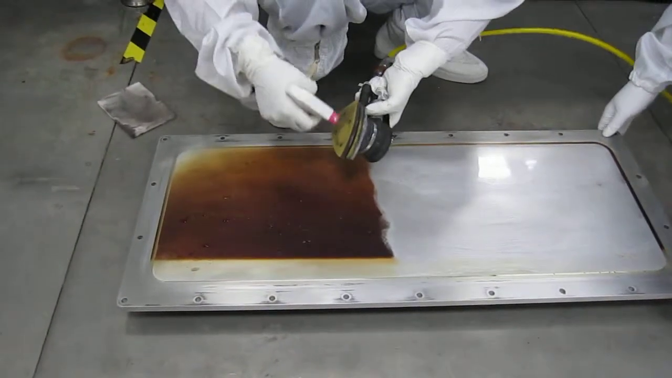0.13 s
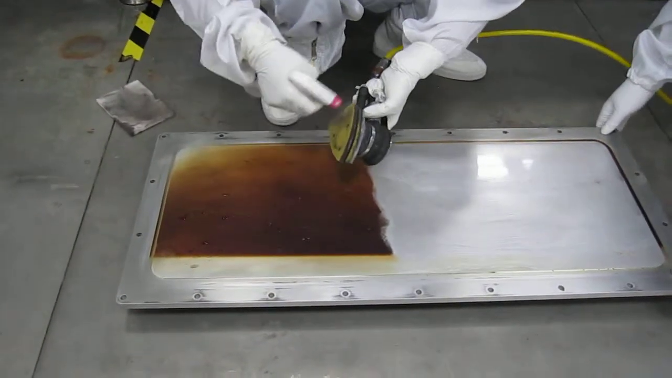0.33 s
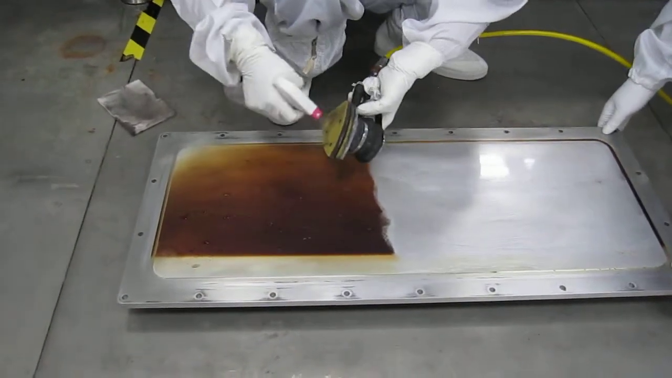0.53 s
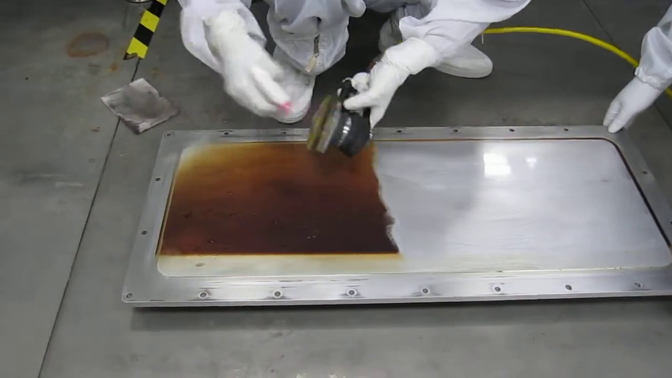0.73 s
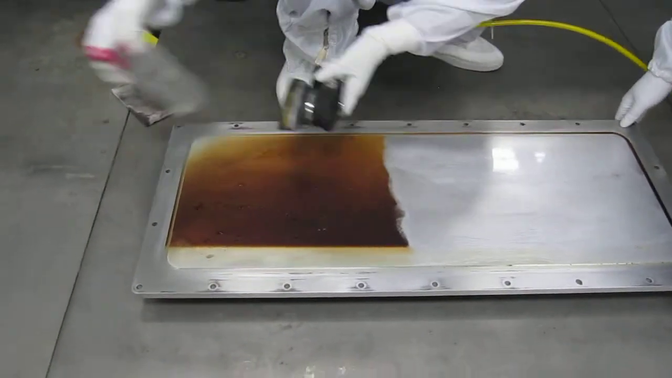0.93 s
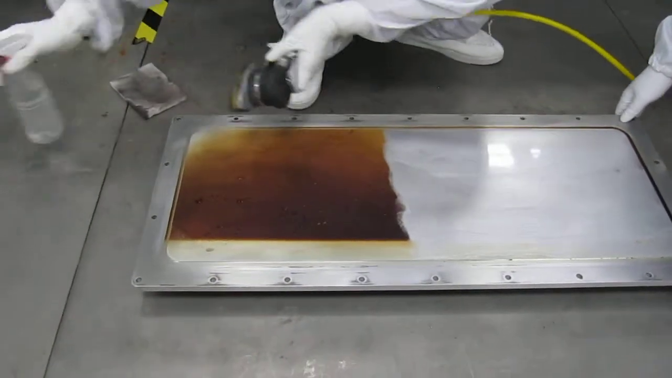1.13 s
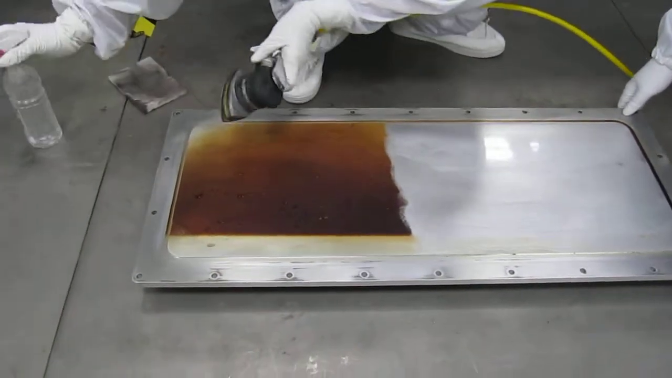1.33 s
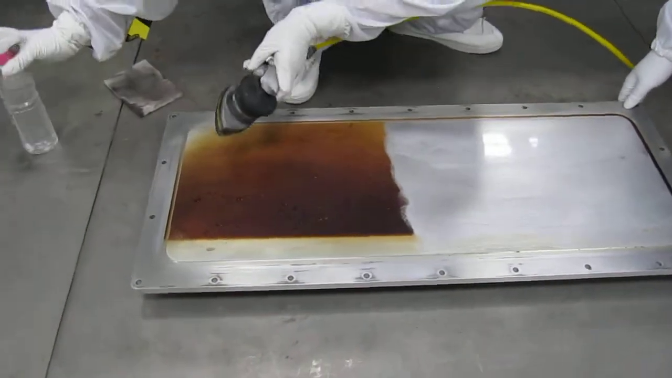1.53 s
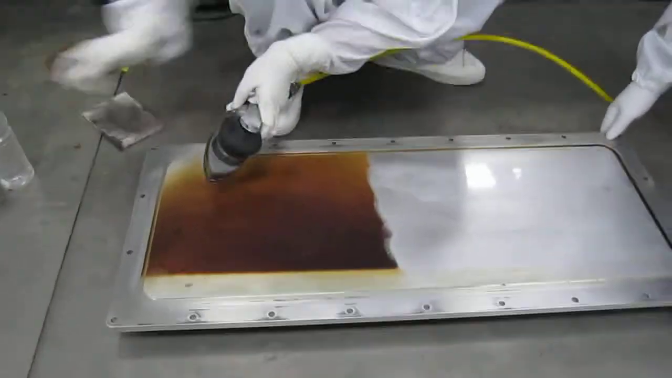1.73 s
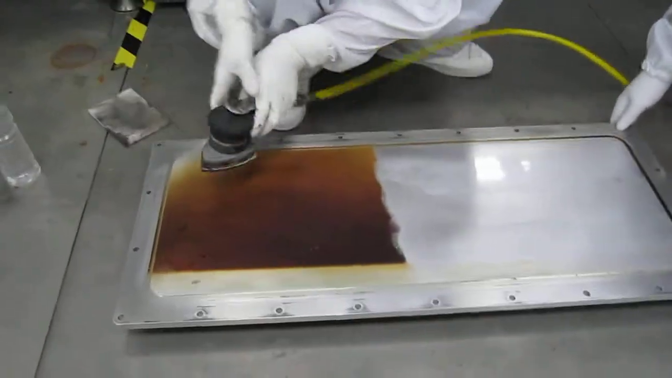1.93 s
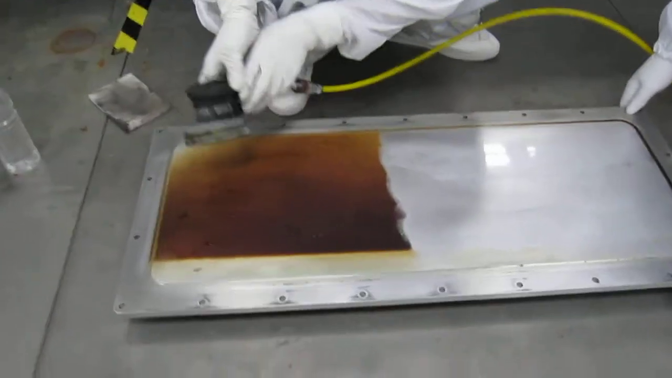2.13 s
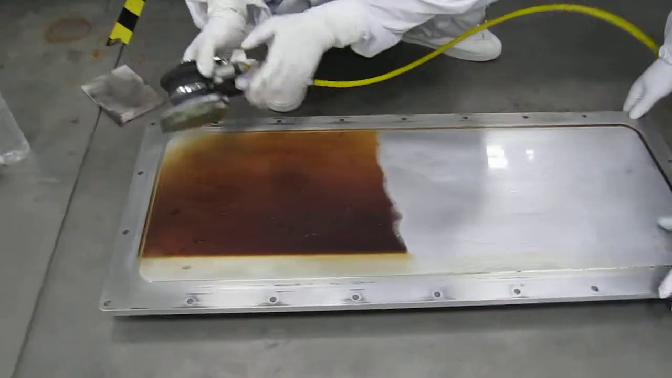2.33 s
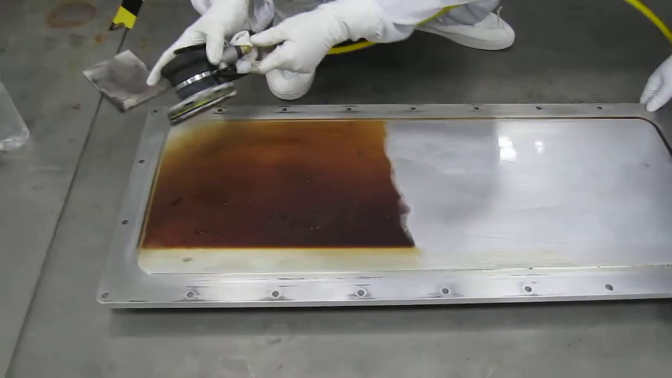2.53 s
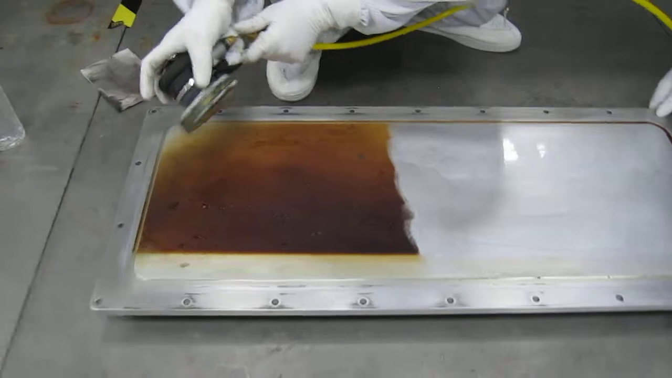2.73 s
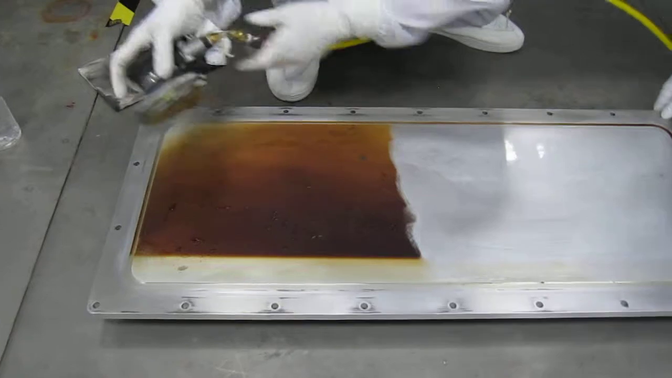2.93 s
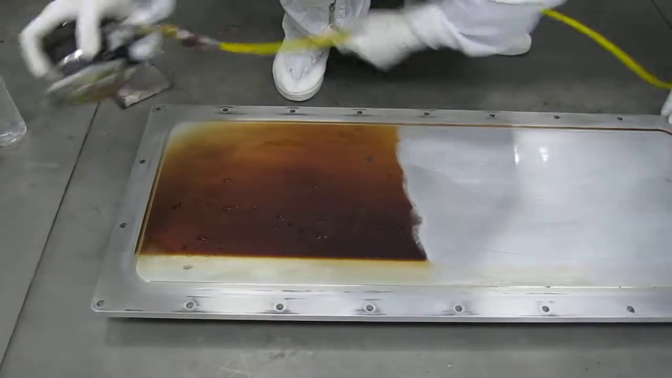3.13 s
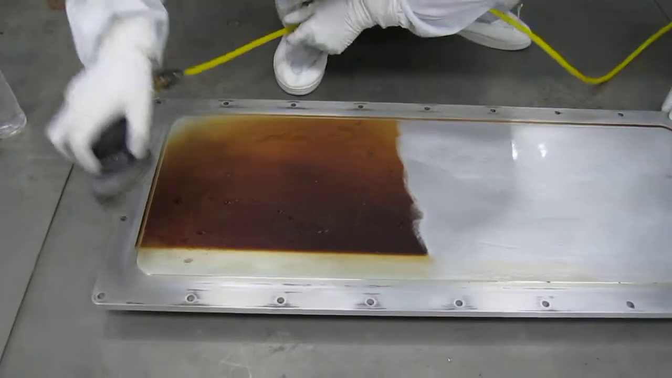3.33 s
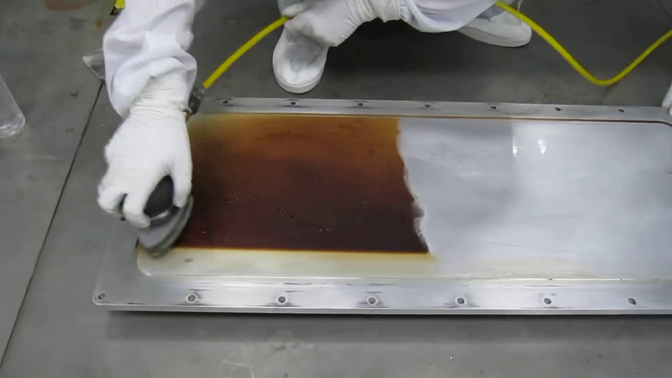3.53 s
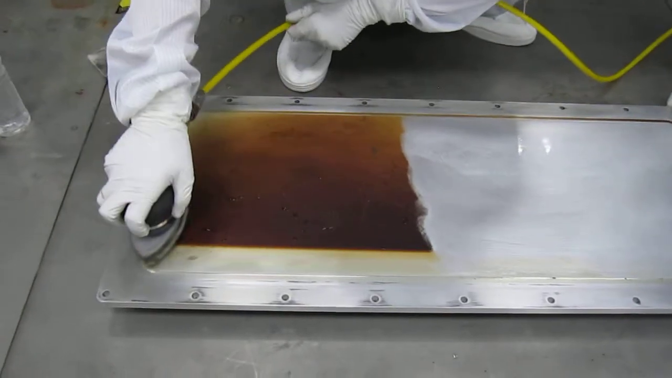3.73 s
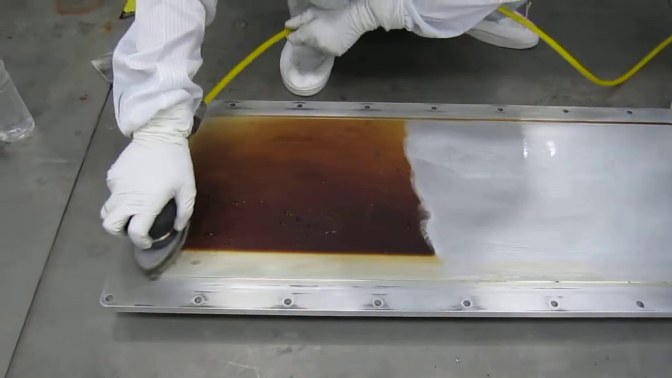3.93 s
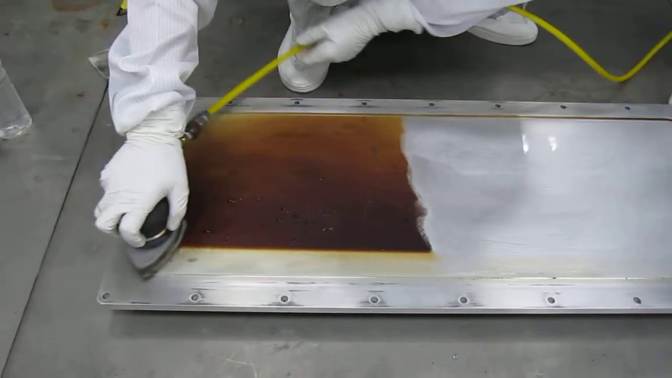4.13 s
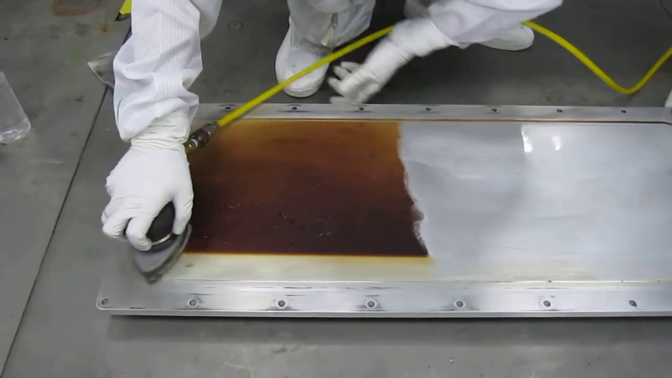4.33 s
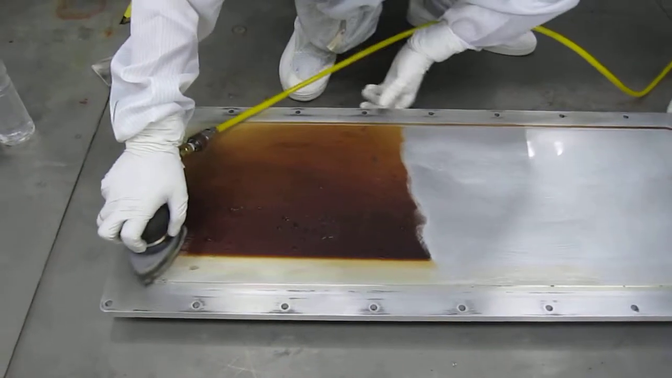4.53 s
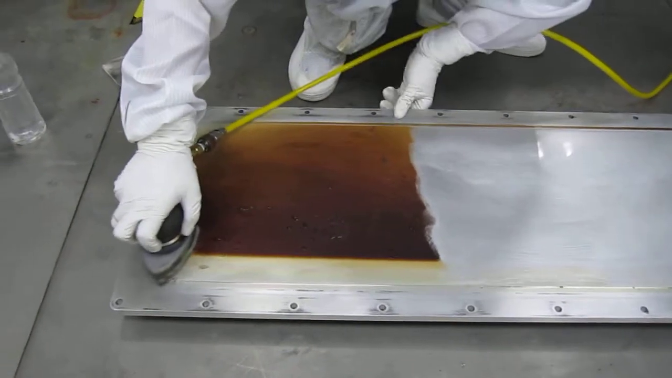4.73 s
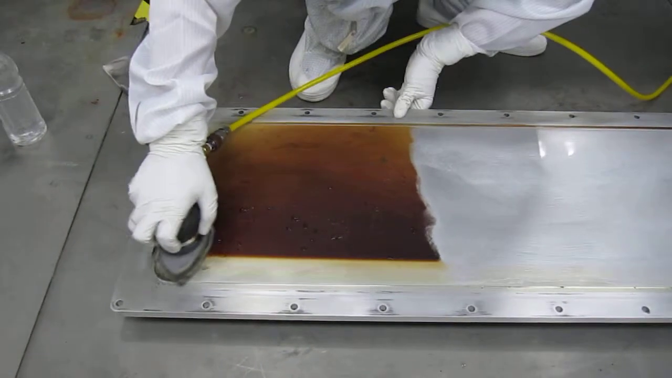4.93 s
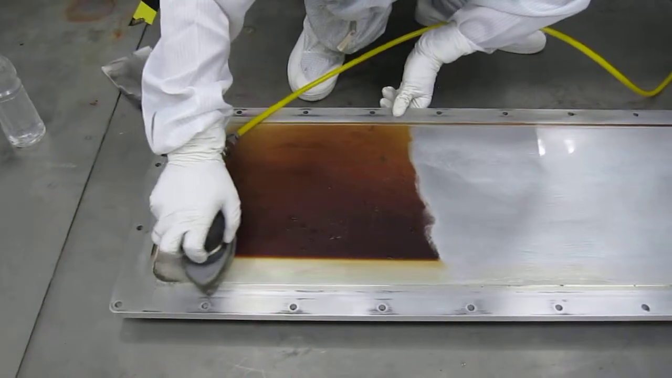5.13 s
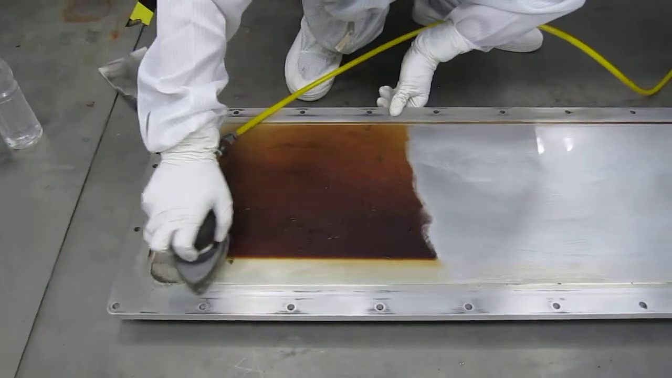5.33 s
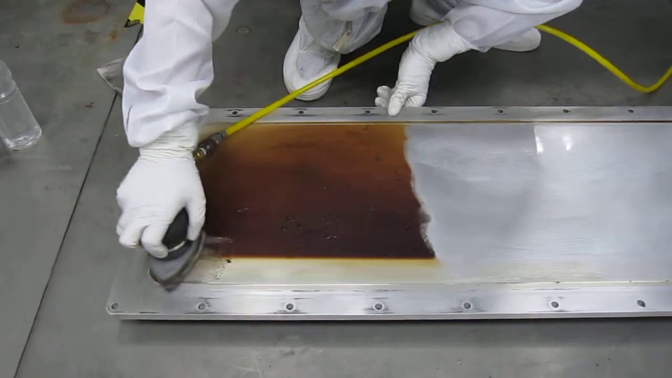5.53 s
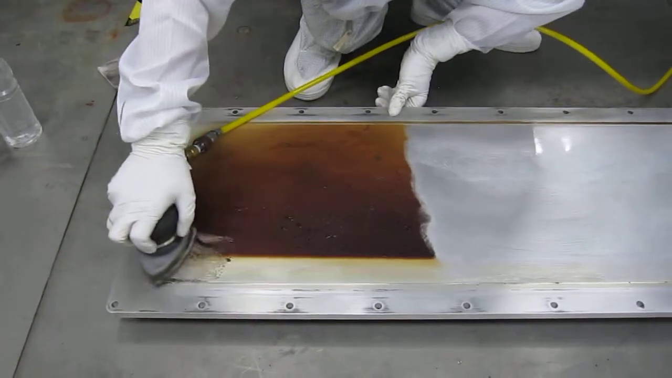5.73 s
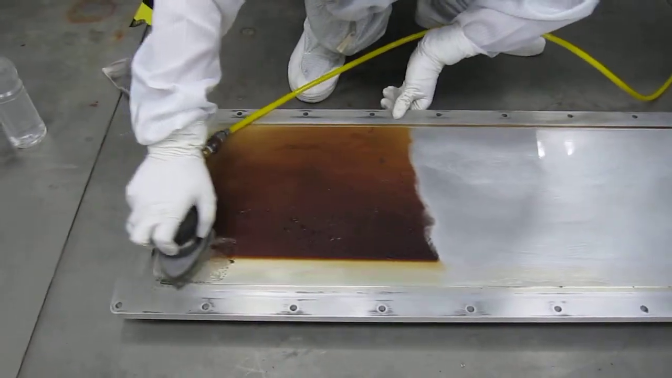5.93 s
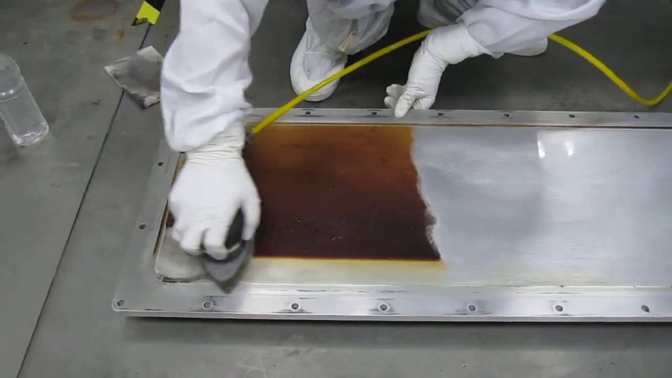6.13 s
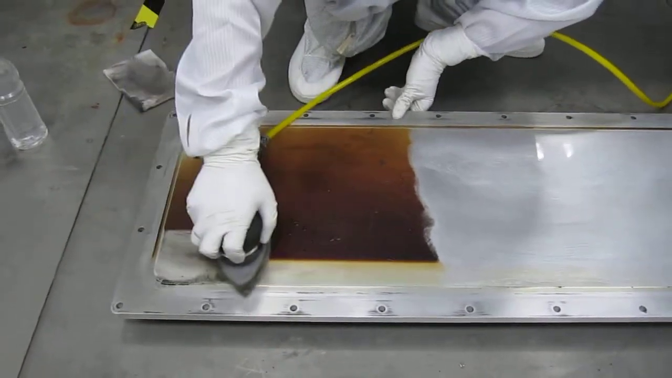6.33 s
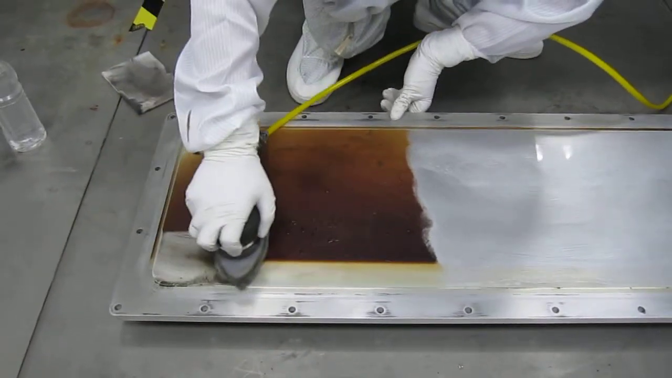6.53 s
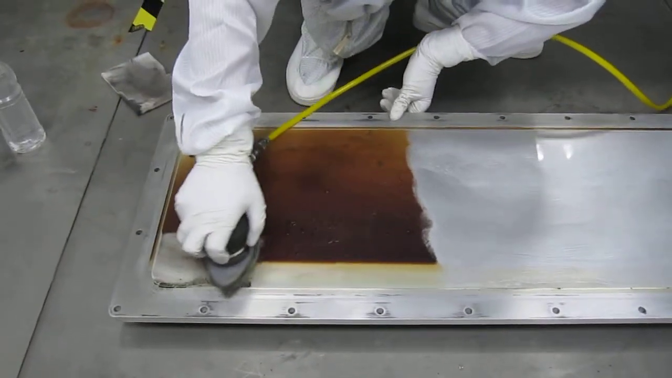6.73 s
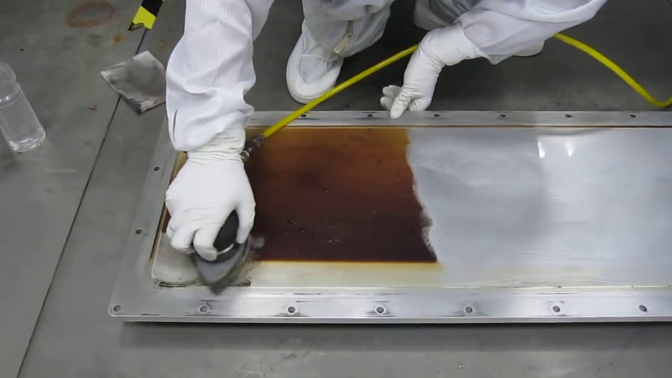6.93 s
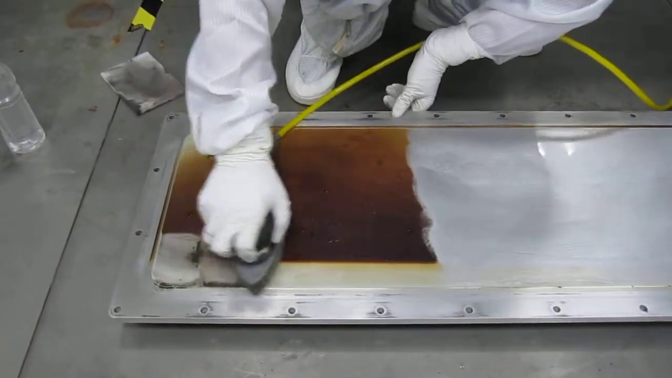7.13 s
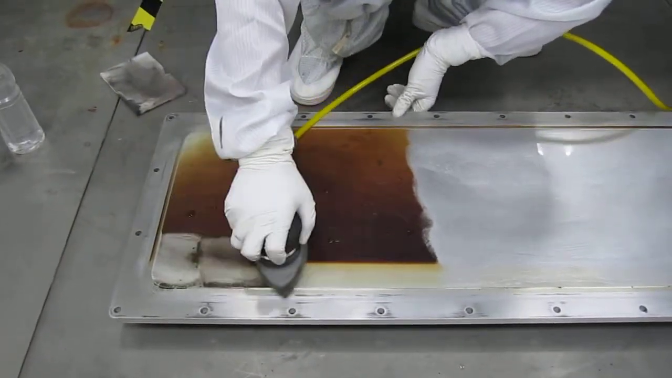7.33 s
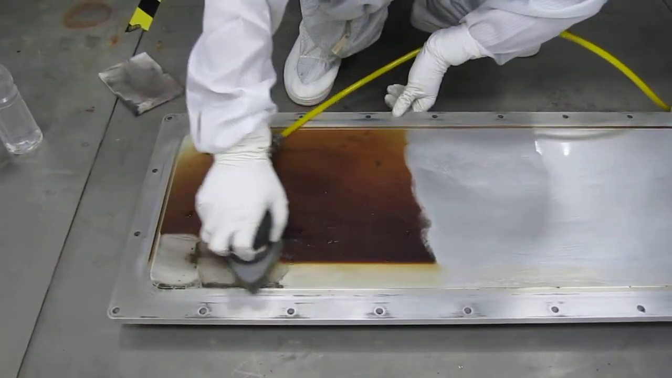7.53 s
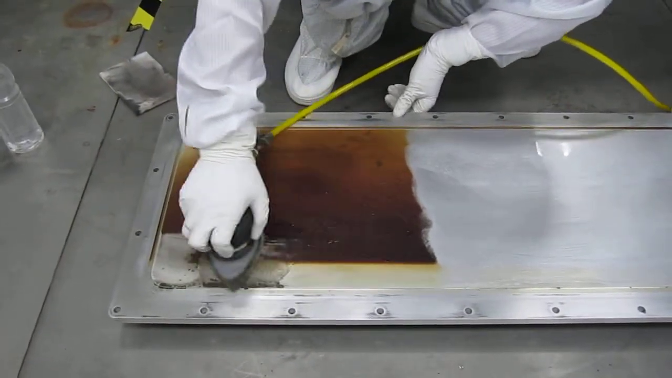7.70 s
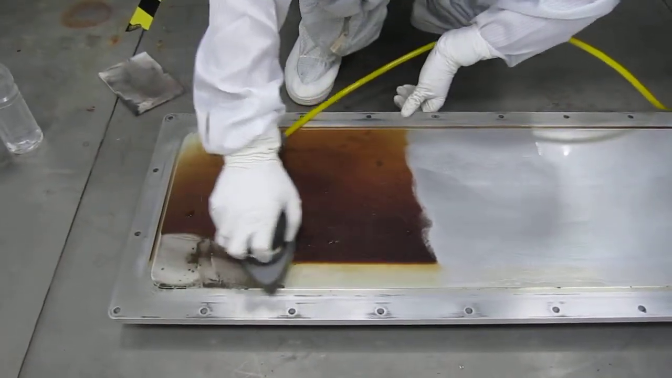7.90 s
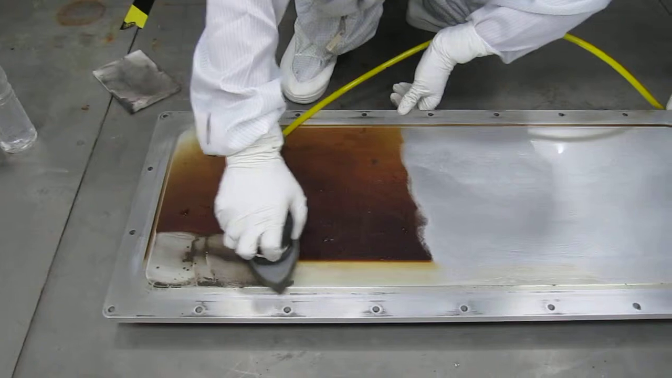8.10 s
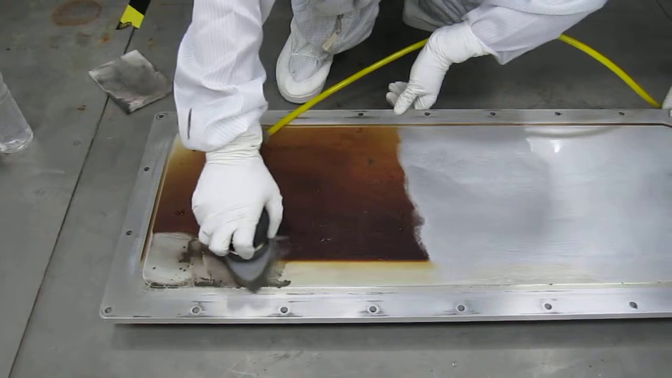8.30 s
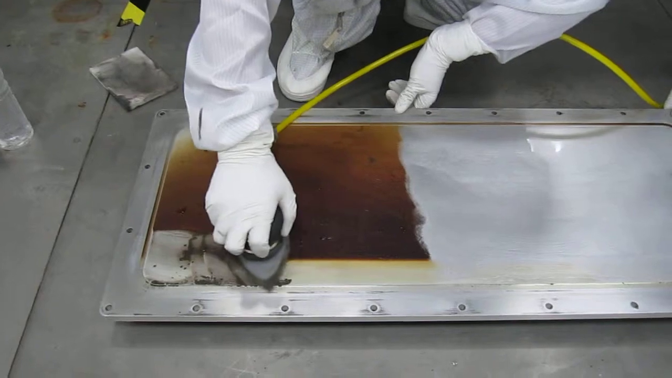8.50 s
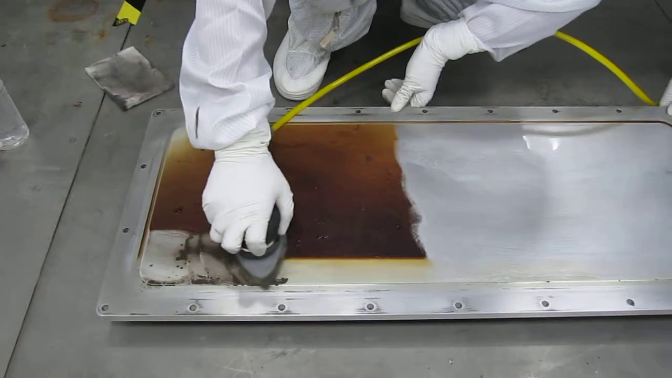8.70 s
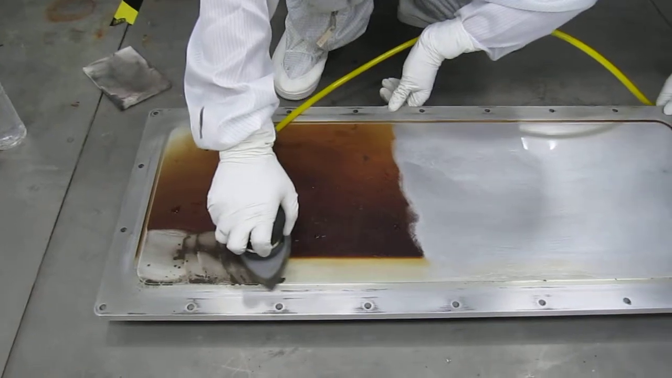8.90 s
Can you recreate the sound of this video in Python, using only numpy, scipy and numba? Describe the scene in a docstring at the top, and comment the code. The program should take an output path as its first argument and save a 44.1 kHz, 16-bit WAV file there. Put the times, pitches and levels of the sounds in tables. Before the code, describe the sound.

Quiet ventilation rumble with faint machine tones. Three soft spray puffs, suit swishes, a bright click and a light bottle landing come first; then handling clicks quicken, a valve whistles and spits air, and a hand polisher bursts into life. Its nasal motor whine wavers slightly under hand pressure, over a ringing housing, airy exhaust and grainy rubbing on metal, continuing to the end. Close mono sound in a reflective room.

```python
"""A hard, humming workshop: an air-driven hand polisher starts up and works on a metal panel.
First a spray bottle squirts mist and is put down, while a suit rustles and small parts click.
Then the valve lets air whistle in, and a five-vane motor spins up, built from sines tied to its shaft.
Shaped noise makes the ringing housing, the exhaust hiss and the pad's scrubbing.
Decaying sines make the knocks, a noise tail makes the room, and loud sound is turned down."""
import sys
import numpy as np
from scipy import signal
from scipy.fft import rfft, irfft
from scipy.io import wavfile
from scipy.ndimage import uniform_filter1d
from numba import njit

SR = 44100
rng = np.random.default_rng(int(sys.argv[2]) if len(sys.argv) > 2 else 0)


def dump_mix(stems):
    """Bounce the given channels to the path in sys.argv[1] as a 16-bit WAV at rate SR."""
    frames = np.atleast_2d(stems).T  # one column per channel
    limited = np.clip(frames, -1, 1)  # hard clip at full scale
    pcm = np.round(limited * 32767).astype(np.int16)
    wavfile.write(sys.argv[1], SR, pcm)


def boost(x):
    """Linear amplitude factor 10**(x/20) for a level x in decibels (scalar or array-like)."""
    u = np.asarray(x, float) / 20
    return 10 ** u


N = 395136
TIME = np.arange(N) / SR
START_S = 3.25  # the motor becomes audible


def gate_between(start_s, end_s):
    """A switch that opens and closes over 10 ms, so that nothing clicks."""
    return uniform_filter1d(1. * ((TIME >= start_s) & (TIME <= end_s)), size=441)


def curves(table):
    """Join each column by straight lines over time."""
    s, *columns = np.transpose(table)
    return [np.interp(TIME, s, column) for column in columns]


def unit(x):
    """Scale to rms 1."""
    return x / np.sqrt(np.mean(x ** 2))


def noise():
    """White noise: all pitches equally strong."""
    return rng.standard_normal(N)


def colour(x, points):
    """Shape the spectrum by (f/Hz, level/dB) points joined on a log pitch axis; rms 1."""
    hz, db = np.transpose(points)
    f = np.arange(N // 2 + 1) * SR / N + 1
    gain = boost(np.interp(np.log(f), np.log(hz), db))
    return unit(irfft(rfft(x) * gain, N))


@njit
def svf(x, hz, width):
    """State-variable band-pass whose centre may move; gain 1 at the centre."""
    y, b, l = np.empty(len(x)), 0., 0.
    for i in range(len(x)):
        g, k = np.tan(np.pi * hz[i] / SR), width / hz[i]
        v = (b + g * (x[i] - l)) / (1 + g * (g + k))
        b, l, y[i] = 2 * v - b, l + 2 * g * v, k * v
    return y


def band(x, hz, width):
    """Band-pass that stays at one pitch."""
    return svf(x, np.full(N, float(hz)), float(width))


def smooth(x, k):
    """Average over k neighbours, twice."""
    return uniform_filter1d(uniform_filter1d(x, k), k)


def walk(rate):
    """Random wavering: a new level every 1 / rate s, smoothed; rms 1."""
    k = int(SR / rate)
    return unit(smooth(np.repeat(rng.standard_normal(N // k + 1), k), k)[:N])


def patchy(points, patchy_db, width_hz, count):
    """Coloured noise with random peaks and dips that melt into new ones as the reflections shift."""
    spectrum, out = rfft(colour(noise(), points)), 0
    k = max(int(width_hz * N / SR), 1)
    for i, draw in enumerate(rng.standard_normal((count, N // 2 + 1))):
        ripple = 2 * np.tanh(unit(smooth(draw, k)) / 2)
        fade = np.clip(1 - np.abs(TIME / TIME[-1] * (count - 1) - i), 0, 1)
        out = out + fade * irfft(spectrum * boost(patchy_db * ripple), N)
    return unit(out)


def swell(s, width):
    """A bell-shaped rise and fall."""
    return np.exp(-.5 * ((TIME - s) / width) ** 2)


def rise(full_db, lack_db, rise_s, drift_db):
    """Level in dB that makes up its lack after the start, plus a steady drift in dB per s."""
    t = np.maximum(TIME - START_S, 0)
    return full_db + lack_db * np.exp(-t / rise_s) + drift_db * t


def ring(hz, t60, length=.15):
    """One sine that sets in within a fraction of a cycle and fades by 60 dB in t60 seconds."""
    t = TIME[:int(length * SR)]
    onset = 1 - np.exp(-10 * hz * t)
    return np.sin(2 * np.pi * hz * t) * np.exp(-np.log(1000) * t / t60) * onset


def add(out, s, sound):
    """Mix a sound in at time s."""
    i = int(s * SR)
    out[i:i + len(sound)] += sound


def butter(x, order, hz, kind):
    """Plain filter that lets through highs ("high") or a range of pitches ("band")."""
    return signal.sosfilt(signal.butter(order, hz, kind, fs=SR, output="sos"), x)


# colour of the ventilation noise: f/Hz, relative level/dB
VENTILATION = [(20, -24), (60, -1), (117, 1.5), (200, -1.5), (350, -3), (700, -4), (2600, -8),
               (11000, -17.5), (16000, -25)]
# distant machines: middle f/Hz, middle level/dB (sine peak against the ventilation's rms)
MACHINES = [(134.6, -12), (203, -21.5), (339.1, -10.5), (672.9, -16.5)]


def hall():
    """Ventilation rumble with a few machine tones that drift in level and slightly in pitch."""
    tones = 0
    for f, db in MACHINES:
        turn = 2 * np.pi * f * np.cumsum(1 + 0.00407 * walk(9)) / SR
        tones = tones + boost(db + 5.9 * walk(4.95)) * np.sin(turn)
    rumble = boost(0.29 * walk(5.67)) * colour(noise(), VENTILATION)
    return boost(-44.5) * (rumble + tones)


def room(x):
    """Hard walls add a decaying noise tail, duller than the direct sound."""
    t60_s, tail_db = 0.6, -12.5
    t = TIME[:SR // 2]
    tail = rng.standard_normal(len(t)) * np.exp(-np.log(1000) * t / t60_s) * (t > .004)
    tail = signal.lfilter([.4], [1, -.6], tail)
    tail = tail / np.sqrt(np.sum(tail ** 2))
    return x + boost(tail_db) * signal.fftconvolve(x, tail)[:N]


# swishes of suit, gloves and hose: peak t/s, width t/s, level/dB, brightness (dB per octave, roughly)
SWISHES = [(.2, 0.11, -41, -7), (.71, 0.03, -42.5, -5), (.947, 0.011, -38, -5), (1.15, 0.084, -43, -1.5),
           (1.71, 0.023, -45, -8.5), (2.14, 0.025, -43, -1.5), (2.6, 0.0089, -39.5, -1.5),
           (2.73, 0.012, -43, -9), (2.978, 0.016, -32.5, -2.5), (3.05, 0.04, -39.5, -2)]


def rustle():
    """Stiff fabric: noise with uneven tiny crackles, dull or bright with each move."""
    # one sample in twenty is raised, by 12 dB at most
    boost_db = np.minimum(4 * rng.exponential(size=N), 12) * (rng.random(N) < .05)
    crackle = noise() * boost(boost_db)
    out = 0
    for s, width, db, tilt in SWISHES:
        points = [(200, -20 - 3 * tilt), (1500, -6 - 2 * tilt), (4500, 0),
                  (12000, 3 * tilt - 4), (16000, 4 * tilt - 10)]
        out = out + boost(db) * swell(s, width) * colour(crackle, points)
    return boost(1.6 * walk(90)) * out


# squeezes of the spray bottle: peak t/s, width t/s, mist level/dB, nozzle f/Hz
SQUEEZES = [(.1, 0.047, -32.5, 5250), (.375, 0.042, -35.5, 6160), (.583, 0.033, -32, 6230)]
# colour of the mist: f/Hz, relative level/dB
MIST_COLOUR = [(1500, -6.5), (3500, -3), (5500, 0.5), (7900, -7), (10600, -3), (13900, -5), (16000, -12)]


def spray():
    """Each squeeze blows a mist with its own nozzle tone; the last one ends in a faint whistle."""
    mist, jet = colour(noise(), MIST_COLOUR), noise()
    low_tone = boost(-13.0) * unit(band(jet, 3000, 300))
    out = 0
    for s, width, db, hz in SQUEEZES:
        nozzle = boost(-7.5) * unit(band(jet, hz, 450))
        out = out + boost(db) * swell(s, width) * (mist + nozzle + low_tone)
    # a thin whistle as the nozzle empties
    empty_s, decay_s = .7, .15
    fade = (TIME > empty_s) * np.exp(-np.abs(TIME - empty_s) / decay_s)
    out = out + boost(-49) * fade * unit(band(jet, 6600, 200))
    return out * boost(0.91 * walk(146.5))


# trigger, coupling and lever, and bright puffs of air at the valve (3.217, 3.238, 3.245 s): t/s, ring level/dB
# (before filtering), ring f/Hz, cycles to fade by 60 dB, crack level/dB
CLICKS_AND_CLACKS = [(.18, -22, 840, 12, -33), (.207, -40, 6000, 5, -35), (.612, -22.5, 923, 12, -45),
                     (0.9314, -9, 1280, 4, -21.5), (2.327, -25, 3800, 9, -39), (2.65, -34, 2200, 8, -39),
                     (2.817, -17.5, 1930, 11, -37), (2.964, -25, 2910, 94, -37),
                     (2.986, -23, 2720, 36, -39), (2.99, -27, 1130, 27, -45), (3.147, -7.5, 1330, 14, -26),
                     (3.16, -9.5, 1490, 14, -29), (3.214, -19, 190, 8, -45), (3.237, -15, 159, 6.5, -43),
                     (3.217, -15, 1630, 11, -11.5), (3.224, -7, 1510, 12, -19), (3.238, -24, 4200, 8, -4),
                     (3.245, -11, 4150, 12, -9)]


def clicks():
    """A small part struck, or a puff of air at the valve: a few cycles of ringing and a short crack of noise."""
    out = np.zeros(N)
    for s, ring_db, hz, cycles, crack_db in CLICKS_AND_CLACKS:
        add(out, s, boost(ring_db) * butter(ring(hz, cycles / hz), 2, hz / 2, "high"))
        # small parts ring high and crack brightly
        crack = butter(rng.standard_normal(800), 3, [hz / 2, min(3.3 * hz, 15000)], "band")
        add(out, s, boost(crack_db) * unit(crack) * np.exp(-TIME[:800] / 0.0038))
    return out


# the bottle lands and rocks: t/s, peak level/dB, hardness (dB per octave)
LANDINGS = [(1.327, -20, 6), (1.334, -24, -5), (1.343, -29, 5), (1.369, -25.5, 5), (1.377, -28, -3),
            (1.403, -32, -10)]
# ringing tones of the bottle: middle f/Hz, t/s to fade by 60 dB
BOTTLE_TONES = [(590, 0.06), (1100, 0.047), (1500, 0.035), (1750, 0.045), (2100, 0.027)]


def bottle():
    """Hollow plastic: a hard edge wakes the upper tones, a flat landing the lowest."""
    out = np.zeros(N)
    for s, db, hard in LANDINGS:
        blow = 0
        for f, t60 in BOTTLE_TONES:
            level_shade, pitch_shade = rng.standard_normal(2)
            tone_db = hard * np.log2(f / 1100) + 2 * level_shade
            blow = blow + boost(tone_db) * ring(f * (1 + 0.052 * pitch_shade), t60)
        add(out, s, boost(db) * blow / np.max(np.abs(blow)))
    return out


def knocks():
    """Clicks and bottle together; small things send no deep bass."""
    return butter(clicks() + bottle(), 2, 150, "high")


# air rushing in: t/s, low whistle level/dB, high whistle level/dB, hiss level/dB
INRUSH = [(3.04, -58, -60, -37), (3.08, -35, -46, -44), (3.14, -26, -38, -33), (3.2, -32, -37, -30.5),
          (3.222, -22, -25, -20.5), (3.26, -40, -27, -25), (3.36, -46, -32, -36)]


def valve():
    """Air whistles roughly in the inlet as the valve opens: two narrow noise bands and a hiss."""
    low_db, high_db, hiss_db = curves(INRUSH)

    def whistle(hz):
        narrow = band(band(noise(), hz, 300), hz, 300)
        return unit(narrow) * boost(2.7 * walk(90))

    points = [(60, -30), (650, -7.5), (800, 3.5), (1050, -20),
              (3200, -9), (4250, 0.5), (5300, -16.0), (16000, -17)]
    hiss = colour(noise(), points) * boost(3.2 * walk(120))
    air = boost(low_db) * whistle(1380) + boost(high_db) * whistle(1790) + boost(hiss_db) * hiss
    return gate_between(INRUSH[0][0], INRUSH[-1][0]) * air


# colour of the exhaust: f/Hz, relative level/dB
EXHAUST_COLOUR = [(3000, -28), (5500, -4), (9500, -6.5), (12000, -5.5), (14000, -16), (16000, -20)]


def exhaust(pressure):
    """Spent air hisses out, and spits as the rotor breaks free."""
    hiss = boost(0.26 * pressure) * patchy(EXHAUST_COLOUR, patchy_db=4.5, width_hz=120, count=10)
    blast_db = 17.5 * np.exp(-np.abs(TIME - START_S) / 0.085)
    return boost(rise(-15, -15, rise_s=0.48, drift_db=0.09) + blast_db) * hiss


# housing resonances: middle f/Hz, width f/Hz, relative level/dB
RESONANCES = [(1319, 52, -3.5), (1178, 21, -11.5), (1540, 54, 1.5)]


def housing(turn):
    """Turbulent air rings the housing, which roars up as the pad first meets the panel."""
    air = noise() * (1 + 0.12 * np.cos(turn))  # the off-centre pad throbs once a turn
    peaks = 0
    for f, width, db in RESONANCES:
        centre = f * (1 + 0.016 * walk(2.5))
        # a wider band lets more noise through; the root evens that out
        peaks = peaks + boost(db) * svf(air, centre, float(width)) / np.sqrt(width)
    broad = band(band(air, 1400, 580), 1400, 580)
    roar = unit(unit(peaks) + boost(-1.5) * unit(broad))
    touch_db = 11.6 * swell(3.57, 0.06)
    return boost(rise(-13, -26, rise_s=0.51, drift_db=-0.41) + touch_db) * roar


# colour of the scrubbing: f/Hz, relative level/dB
SCRUB_COLOUR = [(60, -56), (200, -25.5), (550, -18), (750, -1.5), (980, -8.5), (2100, -4.5), (3400, -5.5),
                (4700, -1), (6000, -9), (8000, -17.5)]
# narrow bands that sing as the pad moves on: peak t/s, width t/s, f/Hz, level/dB
SINGING = [(5.6, 0.53, 4480, -28), (8.5, 1, 5100, -23)]


def pad(pressure):
    """The pad rubs the panel: patchy noise, a dry rasp at first touch, then singing bands."""
    scrub = boost(.7 * pressure) * patchy(SCRUB_COLOUR, patchy_db=3.6, width_hz=50, count=15)
    peak_s, rise_db_per_s, fall_db_per_s = 3.5, 80, 3.5
    rasp_db = -21.5 - np.maximum(rise_db_per_s * (peak_s - TIME), fall_db_per_s * (TIME - peak_s))
    out = boost(rise(-13.5, -7.5, rise_s=1.15, drift_db=0.3)) * scrub
    out = out + boost(rasp_db) * unit(band(scrub, 2300, 1140))
    for s, width, hz, db in SINGING:
        out = out + boost(db) * swell(s, width) * unit(band(scrub, hz, 91))
    return out


# rotor under the hand's load, before spin-up and wavering: t/s, shaft f/Hz, whine level/dB
ROTOR = [(3.44, 136, -11), (3.53, 130.3, -12.5), (3.61, 130.3, -12), (3.74, 141.8, -15.5),
         (3.9, 142.3, -11), (4.1, 140.1, -16), (4.46, 142.4, -9), (4.8, 137, -15.5), (5.06, 142.6, -9.5),
         (5.32, 142.6, -5.5), (5.6, 139.3, -16), (5.94, 137.7, -10), (6.36, 144.2, -7.5), (7.14, 142.1, -7),
         (7.38, 144.7, -4.5), (7.86, 141, -9), (8.08, 142.7, -6), (8.96, 142.1, -5.5)]


def rotor():
    """The shaft speeds up evenly, then levels off; adding up its speed gives its angle."""
    load_hz, whine_db = curves(ROTOR)
    rest_s, spin_up_s = 3.183, .228
    climb = np.maximum((TIME - rest_s) / spin_up_s, .1)
    spin = (1 + climb ** -14) ** (-1 / 14)  # share of full speed
    turn = 2 * np.pi * np.cumsum(spin * load_hz * (1 + 0.0022 * walk(40))) / SR
    return load_hz, whine_db, spin, turn


# weaker shaft tones: shaft multiple (rounded in use), level/dB at the start, drift (dB per s)
SHAFT_TONES = [(2.02, -44.5, -1), (3, -53, 2.5), (4.01, -43, 2), (10.04, -19.5, 0.76), (19.55, -36.5, 1.47),
               (24, -35, 1.2)]
# a tone fades briefly: t/s, shaft multiple, width t/s, depth level/dB
TONE_DIPS = [(3.431, 5, 0.0068, -12), (3.52, 5, 0.0057, -12), (4.02, 5, 0.037, -6), (4.55, 5, 0.033, -9),
             (5.58, 5, 0.053, -9.5), (6.08, 5, 0.067, -7.5), (4.73, 1, 0.082, -7), (5.72, 1, 0.07, -8),
             (6.17, 1, 0.046, -7)]


def motor_tones(load_hz, whine_db, spin, turn):
    """Five vanes whine at five times the shaft rate, over the shaft hum and weaker multiples."""
    def dip_db(multiple):
        return sum(db * swell(s, width) for s, k, width, db in TONE_DIPS if round(k) == multiple)

    rough_db = (0.2 + 5.5 * (1 - spin ** 4)) * walk(70)  # rougher while slow
    whine = boost(whine_db + dip_db(5) + 1.2 * walk(14) + rough_db) * np.sin(5 * turn)
    # the hum grows by 0.7 dB for each Hz of shaft speed above 141 Hz
    hum_db = -30.5 + 0.7 * (load_hz - 141) + dip_db(1) + 0.53 * walk(18)
    hum = boost(hum_db) * np.sin(turn)
    others = 0
    for k, db, drift_db in SHAFT_TONES:
        level_db = db + drift_db * (TIME - START_S) + 3.0 * walk(13)
        others = others + boost(level_db) * np.sin(round(k) * turn + k * k)
    slow_db = -16 * (1 - spin ** 7)  # tones are weaker at a crawl
    tones = boost(slow_db) * (whine + others) + spin ** 2 * hum
    return np.sqrt(2) * boost(rise(-0.5, -9.5, rise_s=0.76, drift_db=0)) * tones


def polisher():
    """The running tool: motor tones, ringing housing, scrubbing pad and exhaust."""
    load_hz, whine_db, spin, turn = rotor()
    pressure = walk(7.7)  # the hand presses unevenly
    tones = motor_tones(load_hz, whine_db, spin, turn)
    running = tones + housing(turn) + pad(pressure) + exhaust(pressure)
    return gate_between(START_S, np.inf) * running


def squeeze(x):
    """Gain control: in dB, only 1 / ratio of the power above the threshold is let through."""
    threshold_db, ratio, memory_s = -23, 5.16, 0.048
    keep = np.exp(-1 / (memory_s * SR))
    power_db = 10 * np.log10(signal.lfilter([1 - keep], [1, -keep], x ** 2) + 1e-12)
    return x * boost(-np.maximum(power_db - threshold_db, 0) * (1 - 1 / ratio))


def scene():
    """All sources at one microphone, the same in both channels."""
    near = rustle() + spray() + knocks() + valve()
    return np.tile(hall() + room(near) + polisher(), (2, 1))


def band_limit(x):
    """A steep low-pass at the top of the band."""
    return signal.sosfilt(signal.butter(12, 16170, fs=SR, output="sos"), x)


def record(dry):
    """Loud sound is turned down and everything from 15730 Hz up is cut off."""
    kept = np.arange(N // 2 + 1) * SR / N < 15730
    mix = irfft(rfft(squeeze(dry)) * kept, N)
    return band_limit(mix)


dry = scene()
out = record(dry)
dump_mix(out)
```